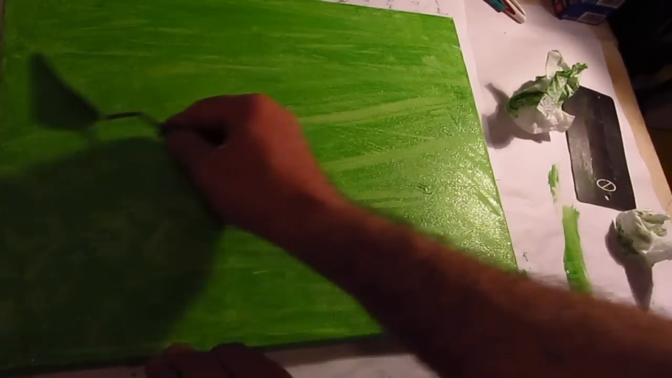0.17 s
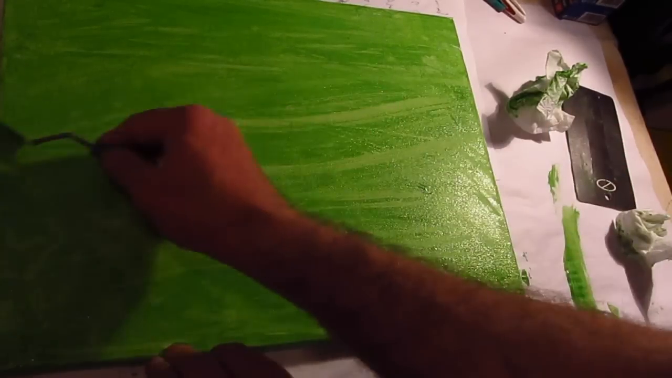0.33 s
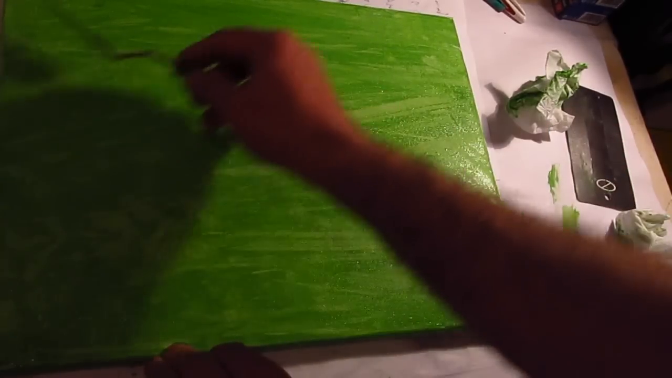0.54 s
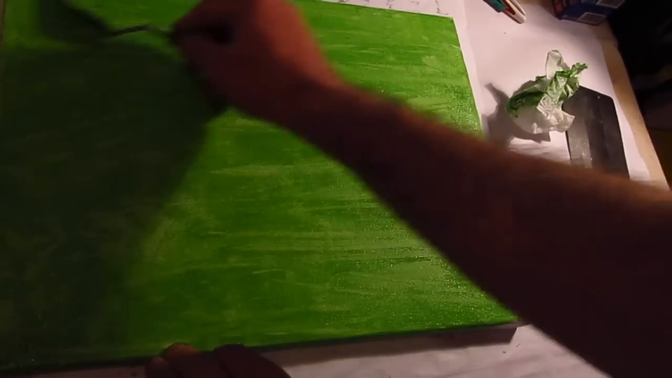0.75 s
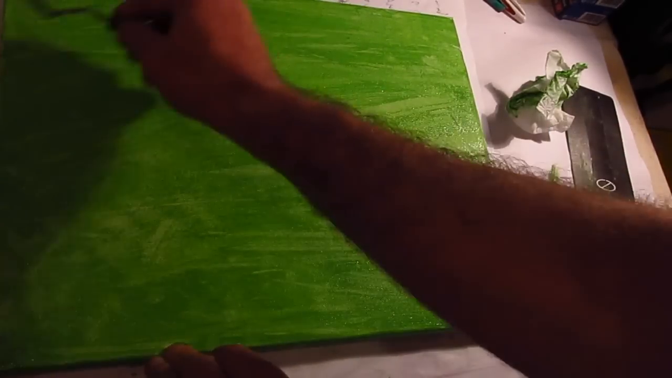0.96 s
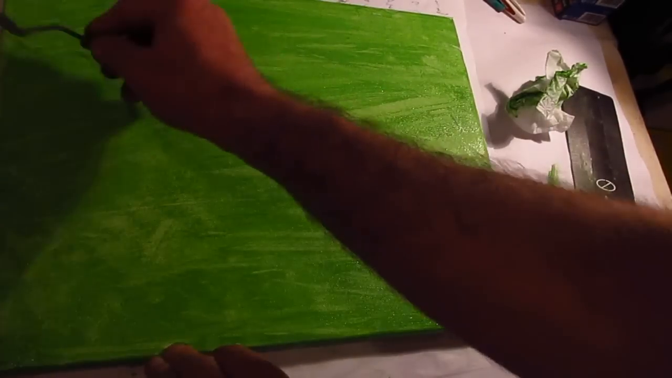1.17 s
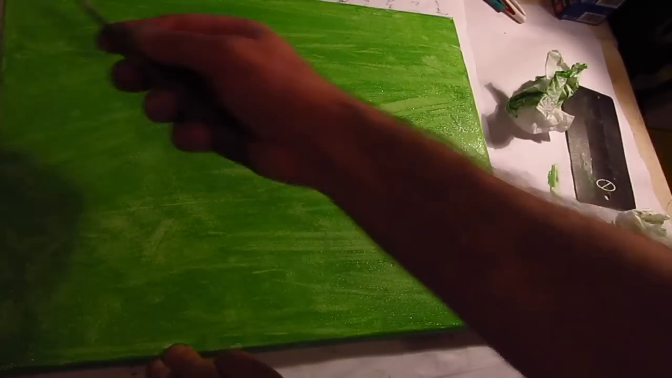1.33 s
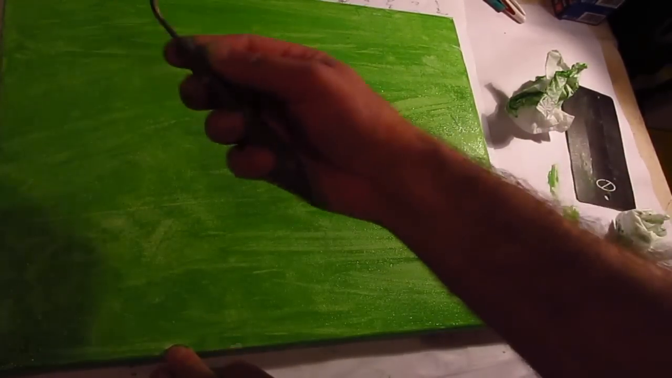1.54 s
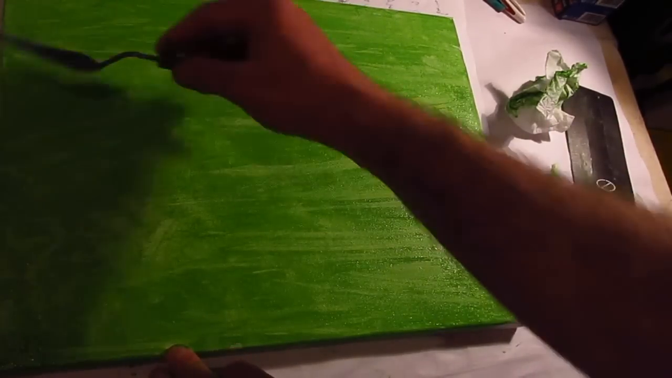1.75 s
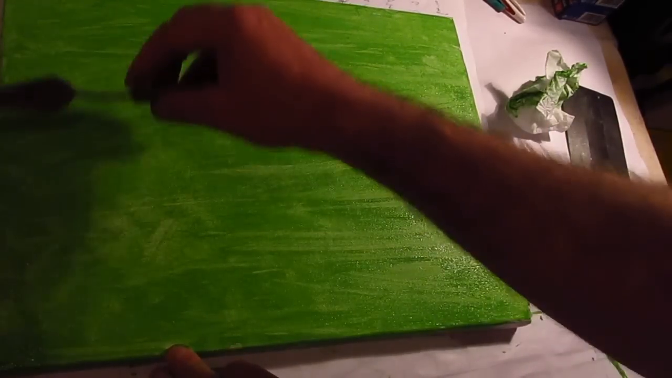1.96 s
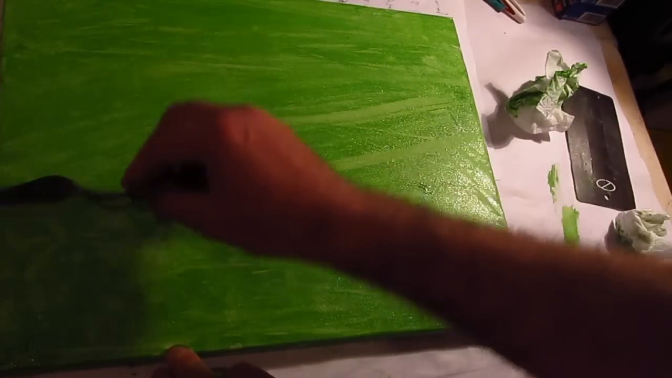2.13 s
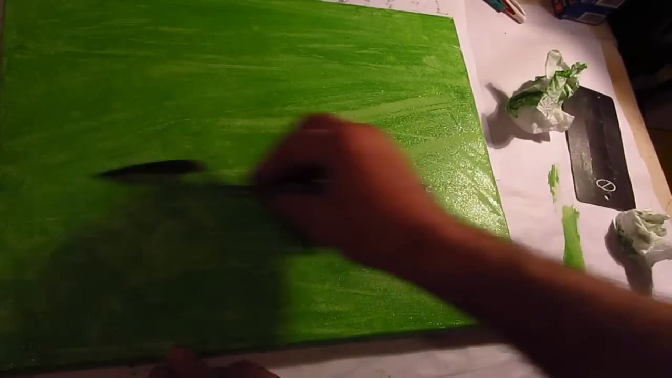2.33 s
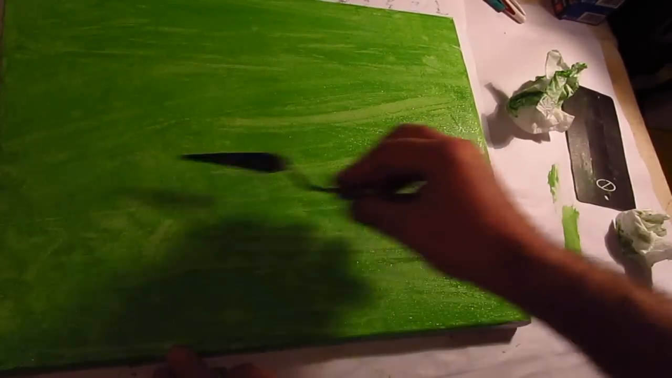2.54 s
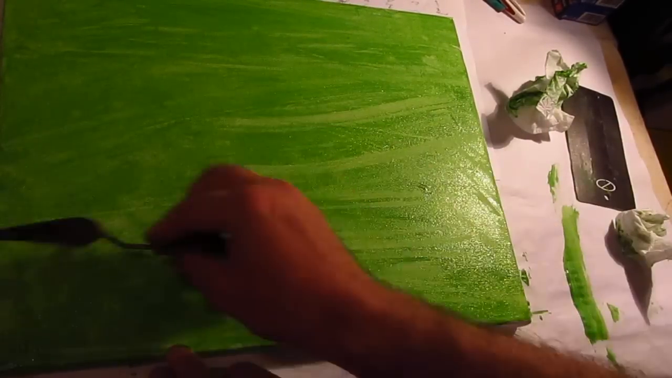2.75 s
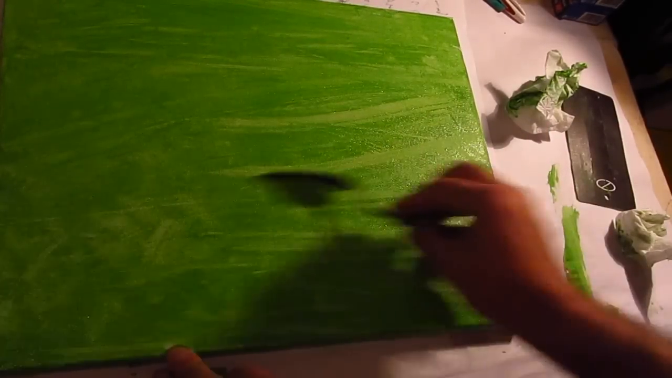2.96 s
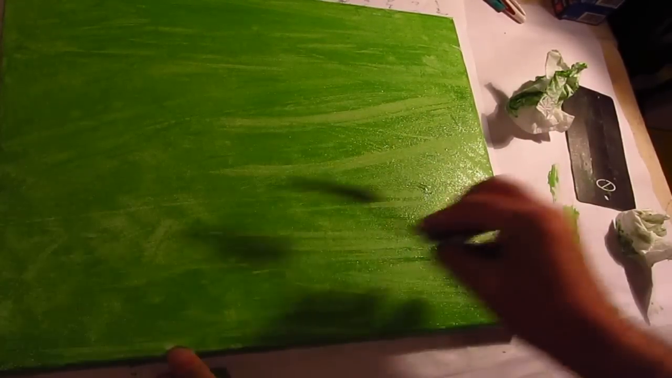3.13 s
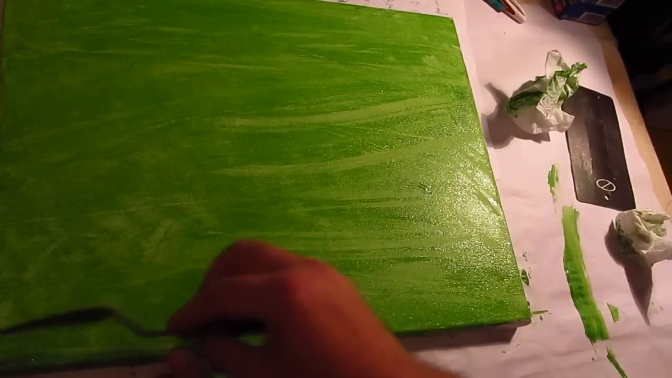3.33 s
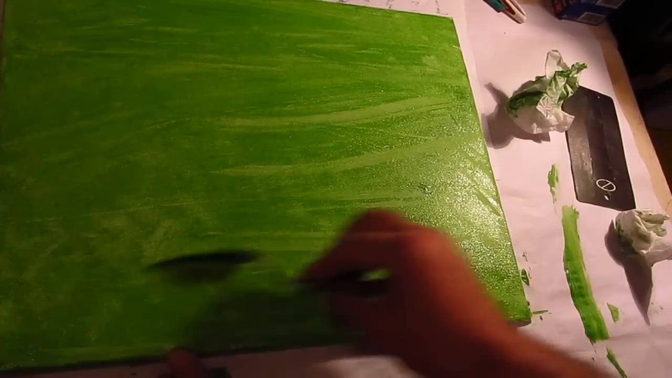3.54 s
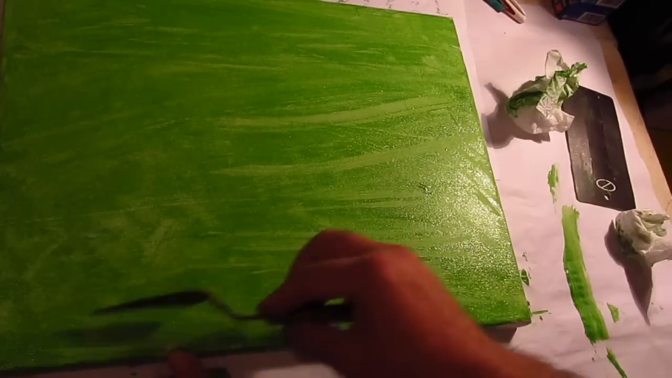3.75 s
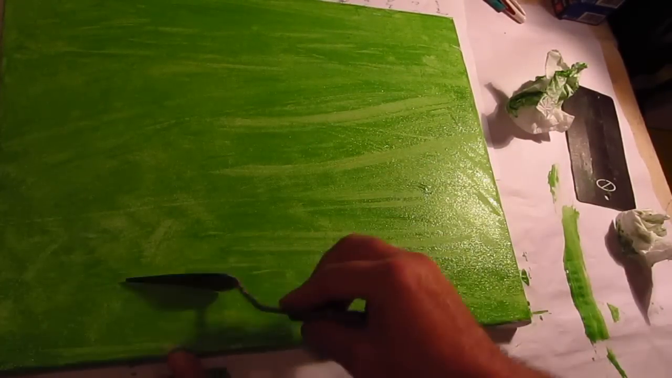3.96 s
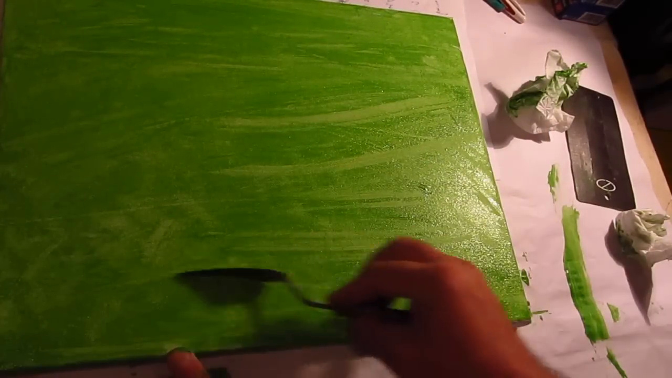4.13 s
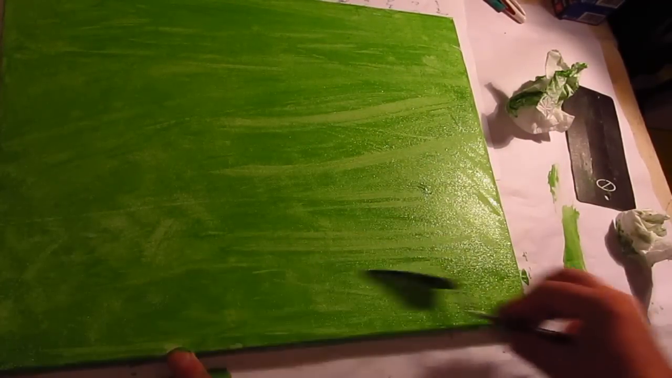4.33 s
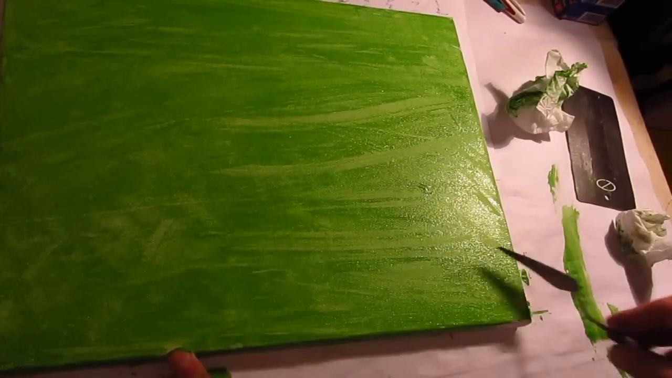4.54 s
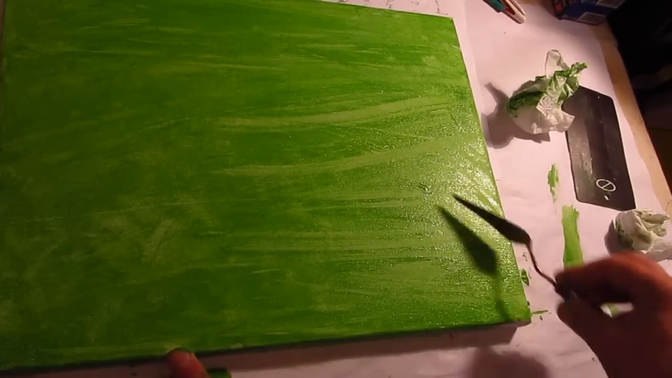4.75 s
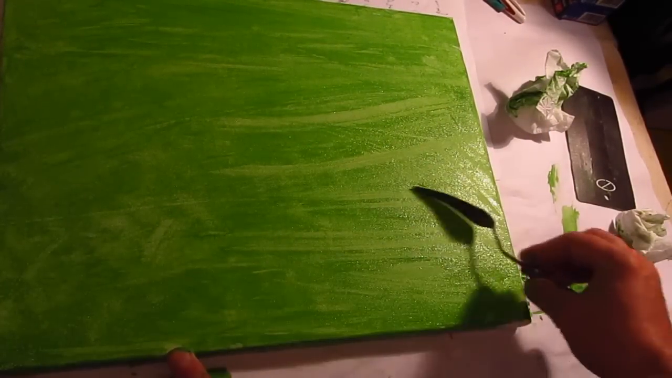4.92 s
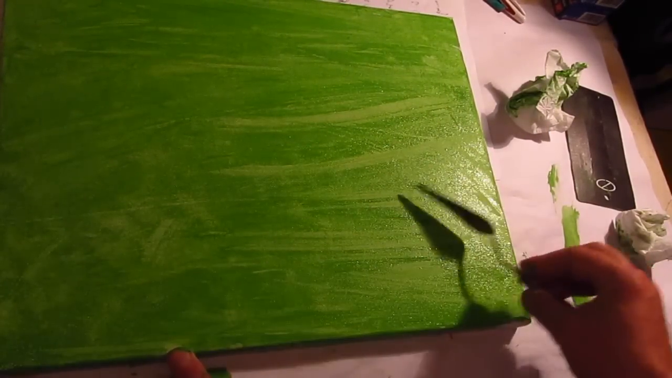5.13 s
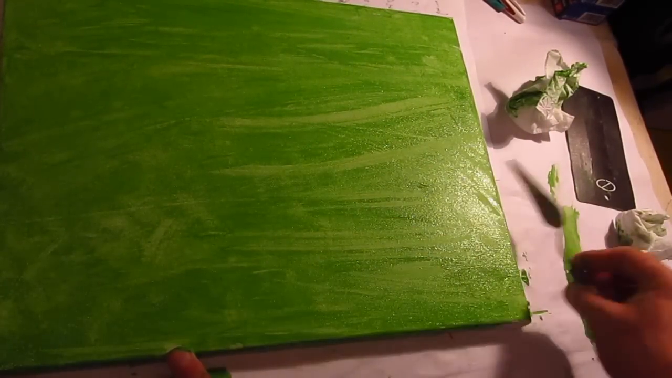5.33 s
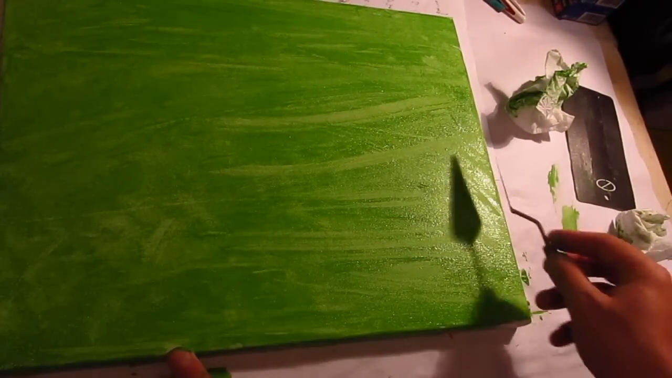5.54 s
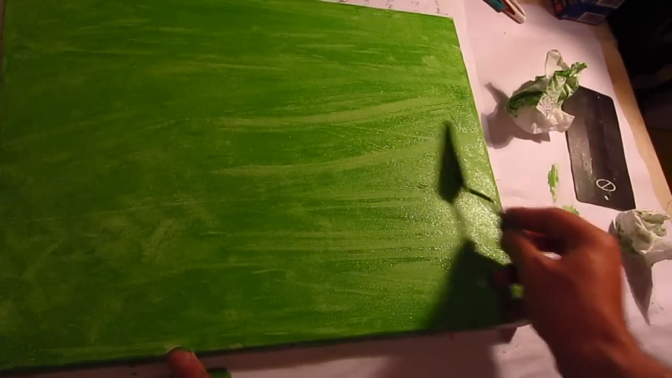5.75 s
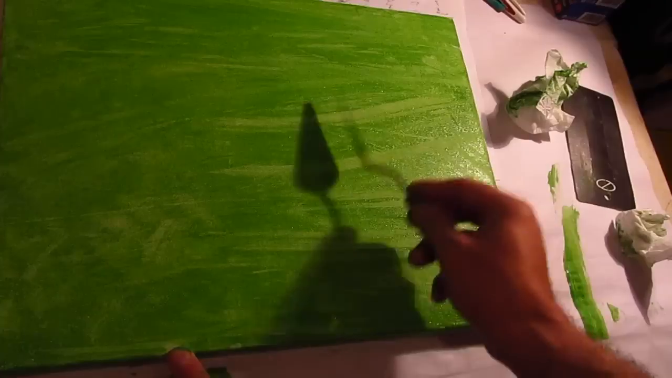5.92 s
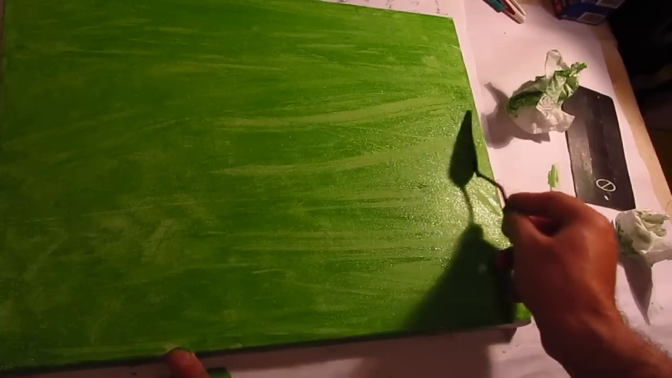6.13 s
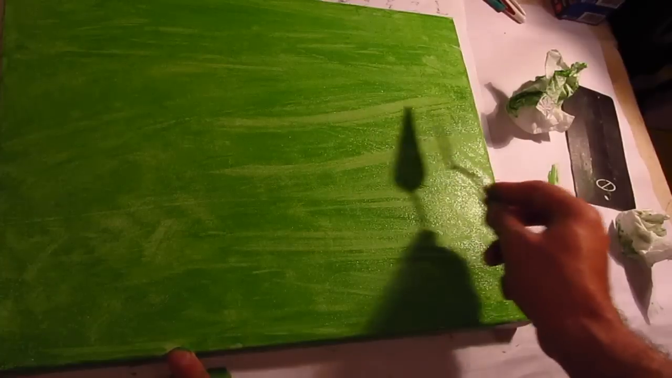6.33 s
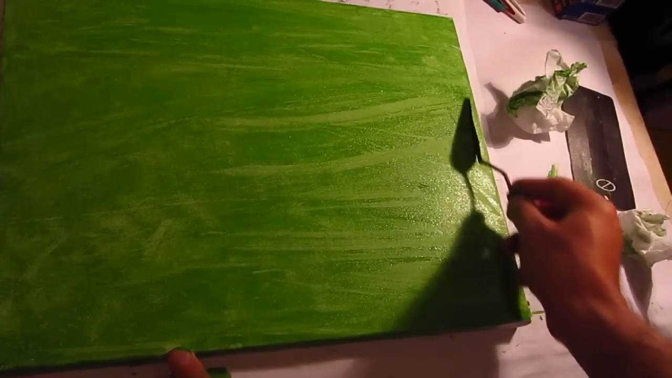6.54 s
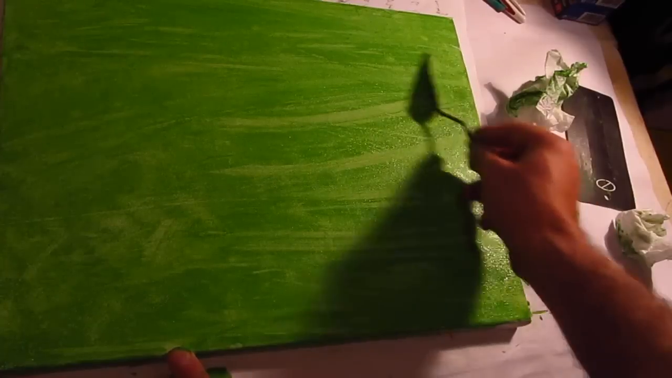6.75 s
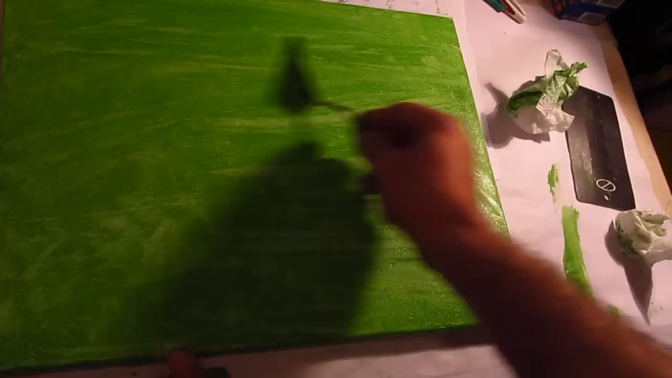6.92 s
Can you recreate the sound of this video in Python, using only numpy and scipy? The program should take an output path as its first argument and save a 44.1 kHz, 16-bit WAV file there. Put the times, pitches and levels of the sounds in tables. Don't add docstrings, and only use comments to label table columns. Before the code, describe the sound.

Close up in a small quiet room, a flexible metal painting knife works on a stretched canvas. Two scrapes come at once, then short gritty strokes separated by pauses, with a harder landing just after two seconds. The cloth answers with a hollow drum tone, the edge hisses over the weave, and the thin blade rings softly as it lifts. Later strokes come more steadily, ending in a sharp tap and scrape.

```python
import sys
import numpy as np
from scipy import signal
from scipy.fft import rfft, irfft, next_fast_len
from scipy.io import wavfile
from scipy.ndimage import uniform_filter1d, minimum_filter1d, map_coordinates

SR = 44100
rng = np.random.default_rng(int(sys.argv[2]) if len(sys.argv) > 2 else 0)


def volts_from_decibels(level):
    exponent = np.asarray(level, float) / 20
    return 10 ** exponent


def output_pcm(signal):
    pcm = np.clip(np.atleast_2d(signal).T, -1, 1) * 32767
    wavfile.write(sys.argv[1], SR, np.round(pcm).astype(np.int16))


N = 307818
TIME = np.arange(N) / SR
FFT_SIZE = next_fast_len(N)
HZ = np.fft.rfftfreq(FFT_SIZE, 1 / SR) + 1
GESTURE_S = np.arange(-100, 7100) / 1000


def level(x, db):
    return x * volts_from_decibels(db) / np.sqrt(np.mean(x ** 2))


def shape(x, gain):
    return irfft(rfft(x, FFT_SIZE) * gain, FFT_SIZE)[..., :N]


def colour(points):
    hz, db = np.transpose(points)
    return volts_from_decibels(np.interp(np.log(HZ), np.log(hz), db))


def band(lo_hz, hi_hz, order=6):
    return 1 / np.sqrt((1 + (lo_hz / HZ) ** (2 * order)) * (1 + (HZ / hi_hz) ** (2 * order)))


def ring(x, hz, t60):
    pole = np.exp(2j * np.pi * hz / SR - np.log(1000) / (max(t60, .002) * SR))
    return signal.lfilter([1], [1, -pole], x).imag


def walk(rate):
    k = int(SR / rate)
    return uniform_filter1d(np.repeat(rng.standard_normal(N // k + 1), k), k)[:N]


def patches(size, step_bins, step_frames):
    field = rng.standard_normal((size[0] // step_bins + 1, size[1] // step_frames + 1))
    return np.kron(field, np.ones((step_bins, step_frames)))[:size[0], :size[1]]


def spread(alike_hz, side_db):
    mid, side = rng.standard_normal((2, N))
    side = shape(side, np.hypot(HZ, volts_from_decibels(side_db) * alike_hz) / np.hypot(HZ, alike_hz))
    return np.array([mid + side, mid - side])


def blend(db, *columns):
    loudest = db.max(axis=0)
    weight = volts_from_decibels(db - loudest) ** 2
    mixed = [np.sum(weight * c, axis=0) / np.sum(weight, axis=0) for c in columns]
    return [np.interp(TIME, GESTURE_S, uniform_filter1d(c, size=7)) for c in [loudest] + mixed]


# pitch_hz, level_db (per Hz)
AIR_COLOUR = [(25, -22.5), (110, -6.5), (160, -9), (260, -2.5), (500, -5), (1000, -10), (1500, -11),
              (2000, -17), (4000, -20.5), (6000, -27), (7500, -28), (9000, -26), (12000, -68.5),
              (14000, -78)]
# pitch_hz, level_db
HUM_TONES = [
    (120, -74.5),
    (210.5, -61.5),
]


def air():
    hum = 0
    for hz, db in HUM_TONES:
        hum = hum + volts_from_decibels(db + 2.0 * walk(3.6)) * np.sqrt(2) * np.sin(2 * np.pi * hz * TIME)
    murmur = level(shape(spread(2200.0, -8.5), colour(AIR_COLOUR)), -53.5)
    return murmur * volts_from_decibels(walk(4.5) + 0.85 * walk(2.1)) + hum


# start_s, pitch_hz, level_db
FRAME_BUMPS = [
    (0.03, 45, -51),
    (2.215, 112.3, -54),
    (2.325, 117, -48.5),
    (2.835, 120, -52),
]


def bumps():
    return sum(volts_from_decibels(db) * np.exp(-((TIME - s - .015) / 0.017) ** 2) * np.sin(2 * np.pi * hz * TIME)
               for s, hz, db in FRAME_BUMPS)


# middle_s, half_length_s, level_db, squeak_hz
FINGER_SHIFTS = [(0.503, 0.0475, -57.5, 3670), (1.596, 0.0814, -59, 2790), (1.689, 0.086, -62, 2734),
                 (1.765, 0.098, -54, 2292), (1.885, 0.0384, -59.5, 2406), (1.967, 0.059, -61.5, 2900),
                 (2.631, 0.099, -56.5, 3010), (2.676, 0.043, -57, 2920), (3.247, 0.043, -52, 3600),
                 (3.407, 0.087, -58.5, 2825), (5.444, 0.086, -61, 3150), (5.683, 0.023, -57, 2850)]


def fingers():
    s, half, db, hz = np.transpose(FINGER_SHIFTS)[:, :, None]
    return blend(db - 20 * ((GESTURE_S - s) / half) ** 2, hz + 0 * GESTURE_S)


def handling():
    db, hz = fingers()
    skin = band(2200, 11000, order=5) * band(1, 7000, order=1)
    hiss = level(shape(spread(1500., 0.94), skin) * volts_from_decibels(2.0 * walk(150)), -2.3)
    squeak = level(np.cos(2 * np.pi * np.cumsum(hz) / SR) * walk(280), -8.5)
    return (hiss + squeak) * volts_from_decibels(db)


# (peak_s, level_db)
BLADE_LIFTS = [
    (2363, .17, [(3.04, -40), (4.77, -36), (5.33, -24)]),
    (2654, .14, [(.355, -46), (.885, -35), (1.145, -31), (2.482, -46), (3.04, -46), (3.61, -37), (4.77, -43), (6.315, -41)]),
    (3740, .11, [(3.035, -36)]),
    (3775, .26, [(4.77, -45), (5.34, -51)]),
    (5071, .13, [(.885, -42), (1.145, -43), (2.482, -42), (3.04, -41), (3.61, -43), (4.77, -44), (5.07, -47)]),
    (6484, .16, [(.885, -38), (1.145, -48), (2.482, -51), (3.04, -39), (3.61, -44), (4.77, -42), (5.34, -45)]),
    (7553, .22, [(1.145, -45), (3.04, -45), (3.61, -46), (4.515, -50), (4.78, -47), (5.09, -46), (5.9, -52)]),
    (8180, .16, [(2.482, -37), (3.04, -51), (4.77, -48), (5.34, -43)]),
    (8899, .14, [(1.145, -40), (5.34, -45), (5.895, -34)]),
    (12436, .25, [(2.32, -58), (3.54, -50), (3.9, -52), (4.98, -58), (5.27, -54), (6.76, -57), (6.9, -56)]),
]


def lifts():
    out = 0
    for hz, t60, rows in BLADE_LIFTS:
        swell = sum(volts_from_decibels(db - 60 * np.maximum(TIME - s, (s - TIME) * 3) / t60) for s, db in rows)
        rough = volts_from_decibels(-.5 + 3.5 * walk(150))
        out = out + swell * rough * np.sin(2 * np.pi * hz * TIME + 1.1 * walk(70))
    return out


# start_s, peak_db, drum_hz, thud_db and snap_db (both over the peak)
LANDINGS = [(0.7, -34, 880, -13.5, 1), (1.063, -26, 1000, -13.5, 2), (1.977, -46, 1210, -11, -14),
            (2.078, -39, 900, -24.5, -22.5), (2.169, -13, 940, -18, -12), (2.794, -18.5, 1187, -20, -10.5),
            (3.442, -30.5, 863, -18.5, 6), (3.68, -43, 850, -28, 1), (3.733, -48, 1140, -27.5, 10.5),
            (3.827, -15, 954, -25, -8.5), (4.037, -36.5, 1240, -13.5, -2), (4.062, -40, 875, -26.5, 3),
            (4.672, -20, 977, -8.5, -2.5), (4.905, -20, 972.7, -29, -11.5), (4.945, -28, 1100, -20, -30),
            (5.205, -19.5, 1053, -20.5, -6.5), (5.701, -28, 976, -22, -3.5), (6.138, -36, 1020, -22.5, 11),
            (6.498, -39, 1066, -19.5, 6.5), (6.798, -11.5, 930, -28, -35)]
# pitch_hz, level_db, t60_s
KNOCK_TONES = [
    (1720, 1, 0.011),
    (2400, 1, 0.006),
    (3387, -1, 0.006),
    (4300, -3, 0.005),
]


def taps():
    size = 4096
    out = np.zeros((2, N + size))
    chance = rng.standard_normal((len(LANDINGS), 2, size))
    t = np.arange(size) / SR
    rattle_filter = signal.butter(2, [600, 4200], 'band', fs=SR)
    for (s, db, drum_hz, thud_db, snap_db), noise in zip(LANDINGS, chance):
        blow = noise * np.exp(-t / .004) * .07
        heel = int(40 + 12 * abs(noise[0, -20]))
        blow[:, 0], blow[:, heel] = 1.0, -.3
        push = blow * (np.arange(size) != heel)
        drum = ring(push, drum_hz, 0.0237) + 0.16 * ring(push, 1.2 * drum_hz, 0.043)
        drum = drum + 0.094 * ring(push, drum_hz, 0.05)
        rattle = signal.lfilter(*rattle_filter, noise[0] + 0.7 * noise)
        drum = drum + volts_from_decibels(-9) * rattle * np.exp(-t / 0.012)
        thud = 1.9 * (ring(blow, 312, .085) - ring(blow, 312, .025))
        thud = thud + 0.1 * ring(blow, 200, 0.053) + .3 * ring(blow, 90, .07)
        knock = sum(volts_from_decibels(g + 1.5 * a) * ring(blow, f * (1 + .07 * b), t60)
                    for (f, g, t60), a, b in zip(KNOCK_TONES, noise[0, -8:], noise[1, -8:]))
        snap = (.5 * np.diff(noise[0], prepend=0) + 1.4 * noise) * np.exp(-t / 0.0049)
        k = int((s + 0.00079) * SR)
        hit = .6 * drum + volts_from_decibels(thud_db) * thud + volts_from_decibels(snap_db) * (.95 * knock + .55 * snap)
        out[:, k:k + size] += volts_from_decibels(db) * hit
    soft_top = colour([(1, 0), (9000, 0), (11000, -16), (14500, -26), (22050, -60)])
    return shape(out[:, :N], band(110, 20000, order=2) * soft_top)


# start_s, swell_s, hold_s, full_db (after the swell), lift_db (at the lift)
PUSHES = [(-.06, 0.046, 0.2968, -25, -25.5), (0.206, 0.055, 0.0957, -26.5, -39),
          (0.706, 0.085, 0.0813, -21, -23.5), (1.075, 0.025, 0.0398, -24, -25.5),
          (2.205, 0.045, 0.21, -31, -33), (2.797, .11, 0.0601, -24, -21.5),
          (2.96, 0.028, 0.0331, -26, -28.5), (3.446, 0.12, 0.0361, -24, -23),
          (3.841, 0.054, 0.03656, -21, -24), (4.035, 0.072, 0.033, -36, -34),
          (4.12, 0.027, 0.048, -35.5, -37.5), (4.195, 0.015, 0.052, -33.5, -33.5),
          (4.239, 0.047, .07, -28, -29), (4.328, 0.099, 0.06765, -19.5, -23),
          (4.676, 0.049, 0.03, -24.5, -25.5), (4.931, 0.069, 0.062, -29.5, -32.5),
          (5.215, 0.037, 0.0659, -21, -19), (5.704, 0.056, 0.073, -26, -23),
          (5.769, 0.051, 0.056, -17.5, -20), (6.159, 0.048, 0.084, -22.5, -24),
          (6.5, 0.22, 0.042, -30.5, -36.5), (6.67, 0.1, 0.041, -22, -19.5),
          (6.817, 0.078, 0.183, -18.5, -29)]
# swell_db, drum_db (over the scrape), flex_db, hiss_db (both over it), chatter_hz
PUSH_GRIPS = [(3, 3, -11, 2, 360), (3, -1, -4, -2.5, 300), (14.64, -4, -10, 1, 525),
              (16.5, -8.5, -10.5, 0, 365), (18.15, -4, -10.5, 0, 360), (19.1, -2.5, -7.5, -2.5, 680),
              (1.99, -1, -4, -1, 530), (9.16, -6.5, -7.5, -3.5, 420), (24.23, -6, -8.5, -4.5, 325),
              (9.61, -5, -2.5, -7, 435), (3, -4.5, -12, -4.5, 370), (5, -12, 0.5, -3.5, 300),
              (11.1, -13.5, 0.5, -4.5, 390), (9.5, -8.5, -7, -7, 390), (2.02, -4, -5.5, -2.5, 240),
              (31.3, -2, -7, 0, 1000), (24.01, -1.5, -4.5, -3.5, 430), (15.5, 3.5, -1.5, -7.5, 540),
              (5.92, -6, -8, -1.5, 490), (28.8, 4, -4.5, 1.5, 590), (16.6, -3, -14, -3, 200),
              (10.7, 2.5, -4, -1.5, 330), (2, -5.5, -7.5, 2.5, 120)]
PUSH_WEAVE_DB = [3.5, 3.5, 3, 1.5, -1.5, 0.5, 0.5, 0.5, -0.5, -7, -11, -2, -6, 3.2, -4.5, 4, 0, 4, -20, -3,
                 -18, 6.5, -9]
PUSH_BITE_DB = [2, -1, 4.5, 0.5, 0, 1, 0, -5, -1.5, -3.5, 2, -4.5, -2, -0.5, 0.5, 6.5, 3, -1, 2, 1, -9,
                -2.5, -4]
# pitch_hz, level_db
PUSH_SINGING = [(1050, 0.5), (950, 1), (2300, 2.5), (2400, 1.5), (2050, 6.5), (2950, 1), (1000, 0.5),
                (2600, 4.5), (1500, 2.5), (1680, 1.5), (1680, -1.5), (1700, 2), (1700, 1), (1720, -1.5),
                (1800, 4), (1100, 9.5), (1050, 1.5), (850, 1), (950, 0.5), (1100, 3), (1000, 0), (900, 2),
                (1200, 5.5)]


def hand():
    start, swell, hold, full_db, lift_db = np.transpose(PUSHES)[:, :, None]
    swell_db, drum_db, flex_db, hiss_db, chatter_hz = np.transpose(PUSH_GRIPS)[:, :, None]
    age = GESTURE_S - start
    free = np.maximum(age - swell - hold, 0)
    db = full_db - swell_db * np.clip(1 - age / swell, 0, 1) ** 1.3
    db = db + (lift_db - full_db) * np.clip((age - swell) / hold, 0, 1)
    db = db - 525.5 * free - 6 * (1 - np.exp(-free / 0.004))
    db = db - 4000 * np.maximum(-age, 0)
    tip = np.clip(age / (swell + hold), 0, 1) - .5
    light = np.clip((np.maximum(full_db, lift_db) - db) / 20, 0, 1)
    return blend(db, drum_db + 0.5 * tip, flex_db + 1.5 * tip, hiss_db + 4 * tip,
                 chatter_hz * (1 - 0.37 * light),
                 np.array(PUSH_WEAVE_DB)[:, None], np.array(PUSH_BITE_DB)[:, None],
                 *np.transpose(PUSH_SINGING)[:, :, None])


def thread_rub(patch, sing_hz, sing_db):
    grains = rng.standard_normal(N) * volts_from_decibels(np.minimum(3.0 * rng.exponential(size=N), 12))
    rub = level(grains, -0.89) + level(patch, -1.2) * volts_from_decibels(2.0 * walk(900))
    z = signal.stft(rub, nperseg=512)[2]
    field = uniform_filter1d(patches(z.shape[1:], 3, 10), size=3, axis=0)
    field = uniform_filter1d(field, size=10, axis=1)
    frame = np.minimum(np.arange(z.shape[2]) * 256, N - 1)
    bin_hz = np.arange(z.shape[1])[:, None] * SR / 512
    off = (bin_hz - sing_hz[frame]) * 2 / 260
    z = z * volts_from_decibels(3.1 * field + sing_db[frame] / (1 + off ** 2))
    return signal.istft(z, nperseg=512)[1][:, :N]


# middle_s, change_db
EDGE_FLICKS = [(0.756, 0.5), (.82, 4.5), (0.876, 6.5), (1.098, 5), (1.124, 1.5), (2.469, 13), (2.93, 2.5),
               (2.958, 3.5), (3.6, 2), (5.825, -4), (4.13, 5), (4.269, 0), (4.502, 7.5), (4.722, 3),
               (4.755, 3), (5.058, 5.5), (5.327, 5.5)]


def flicks():
    return sum(g * np.exp(-((TIME - s) / 0.004) ** 2) for s, g in EDGE_FLICKS)


# start_s, change_db, ease_s
WEAVE_CATCHES = [(0.711, -6, 0.0208), (.736, 1, .02), (1.094, -1, 0.0195), (2.223, 4.5, .02),
                 (2.457, 4.5, .015), (2.888, 5, .02), (2.955, -2.5, .008), (3.015, 3.5, 0.018),
                 (3.884, 0.5, .02), (4.061, 1.5, 0.01525), (4.102, 6, .03), (4.211, 1.5, .02),
                 (4.263, 7, 0.0182), (4.386, 0, 0.0172), (4.695, -3.5, 0.0179), (4.72, 3, 0.022),
                 (4.98, -0.5, 0.0214), (5.003, -1.5, 0.015), (5.238, -1.5, 0.01333), (5.253, -1, 0.0358),
                 (5.72, 2, 0.0285), (5.764, 2, 0.01986), (6.187, 7.5, 0.0077), (6.59, -0.5, 0.014),
                 (6.647, 1, 0.022)]


def catches():
    return sum(g * (TIME > s) * np.exp(-np.abs(TIME - s) / ease) for s, g, ease in WEAVE_CATCHES)


# pitch_hz, level_db (per Hz)
SCRAPE_COLOUR = [(350, -42.5), (600, -1.5), (743, -14), (854, -4.5), (981, -5.5), (1470, -4.5), (2520, -8),
                 (2970, -5), (5500, -10), (5940, -6.5), (7080, -9.5), (10300, -14), (12200, -27),
                 (15800, -72.5), (22000, -120)]
# pitch_hz, width_hz, boost_db
CANVAS_TONES = [
    (847, 320, 8),
    (945, 25, 4.5),
    (1125, 240, 4),
    (1594, 28, 2.5),
    (2250, 78, 0),
    (2900, 150, 0.5),
    (4660, 380, 0.5),
    (6330, 880, -3.5),
]


def cloth(rub, drum_db, flex_db, bite_db, hiss_db, bent, flick):
    body = colour(SCRAPE_COLOUR)
    body = body * volts_from_decibels(sum(g / (1 + (2 * (HZ - f) / w) ** 2) for f, w, g in CANVAS_TONES))
    parts = [(band(700, 1300), volts_from_decibels(drum_db) * volts_from_decibels(-.6 * flick)),
             (band(1300, 2000), volts_from_decibels(flex_db) * np.sqrt(1 - bent)),
             (band(2000, 2700), .52 * volts_from_decibels(bite_db)),
             (band(2700, 5000), .85),
             (band(5000, 13000), volts_from_decibels(hiss_db + 3))]
    return sum(level(shape(rub, body * part), 0) * gain * volts_from_decibels(1.3 * walk(60)) for part, gain in parts)


# pitch_hz, width_hz, level_db
FLEX_TONES = [
    (1697, 190, 9),
    (2445, 82, 1),
    (2920, 120, -2.5),
    (4060, 310, -10.5),
]


def bent_blade(rub, flex_db, bent):
    steel = np.sqrt(sum(volts_from_decibels(g) ** 2 / (1 + (2 * (HZ - f) / w) ** 2) ** 2 for f, w, g in FLEX_TONES))
    return level(shape(rub, steel), 0.58) * volts_from_decibels(flex_db + 2.0 * walk(50)) * np.sqrt(bent)


def weave_chatter(patch, db, chatter_hz, weave_db):
    chatter_db = np.minimum(-14.5 - 0.56 * (db + 28.5) + weave_db, 8)
    turn = 2 * np.pi * np.cumsum(chatter_hz * (1 + 0.07 * walk(45))) / SR
    tone = np.cos(turn) * volts_from_decibels(6.0 * walk(45))
    rumble = 0.81 * level(shape(patch, band(250, 640)), 0)
    return volts_from_decibels(chatter_db) * level(tone + rumble, 0)


def scrape():
    db, drum_db, flex_db, hiss_db, chatter_hz, weave_db, bite_db, sing_hz, sing_db = hand()
    patch = spread(2000.0, -7)
    rub = thread_rub(patch, sing_hz, sing_db)
    bent = np.clip((flex_db - drum_db + 2.5) / 3.5, 0, .9)
    flick = flicks()
    stutter = walk(90) + 1.3 * walk(450) + flick + catches()
    out = cloth(rub, drum_db, flex_db, bite_db, hiss_db, bent, flick) + bent_blade(rub, flex_db, bent)
    out = out + weave_chatter(patch, db, chatter_hz, weave_db)
    return out * volts_from_decibels(db - 4.0 + stutter)


# pitch_hz, level_db, t60_s
BLADE_TONES = [
    (2365, -23.5, 0.16),
    (3750, -28.5, 0.15),
    (5340, -26.5, 0.23),
    (6480, -24.5, .18),
    (7400, -22.5, 0.1),
]


def blade_ring(knife):
    strike = knife.mean(axis=0)
    return sum(volts_from_decibels(db) * ring(strike, hz, t60) / np.sqrt(t60 * SR) for hz, db, t60 in BLADE_TONES)


# time_s, left_minus_right_db, left_lag_samples
BLADE_PLACE = [
    (0, 9, -2),
    (1.3, 10.5, -2.5),
    (3.9, 6.5, 1.45),
    (4.1, 7, 0.8),
    (5.499, 5, -1.5),
    (6.98, 7, 0.25),
]


def two_ports(knife):
    s, *place = np.transpose(BLADE_PLACE)
    pan_db, lag = (np.interp(TIME, s, c) for c in place)
    low = shape(knife, band(0.94, 3000, order=1))
    knife = low + (knife - low) * volts_from_decibels(np.array([pan_db, -pan_db]) / 2)
    knife[1] = map_coordinates(knife[1], [np.arange(N) + lag], order=3, mode="nearest")
    knife[1] = shape(knife[1], 1 + volts_from_decibels(-20.5) * np.exp(-2j * np.pi * HZ * 0.0002731))
    return knife


def room(knife):
    t = np.arange(SR // 2) / SR
    walls = rng.standard_normal((2, len(t)))
    walls = walls + .3 * walls[::-1]
    dull = signal.lfilter(*signal.butter(2, 2600, fs=SR), walls)
    bass_t60_s, treble_t60_s = 0.17, 0.14
    walls = dull * volts_from_decibels(-60 * t / bass_t60_s) + (walls - dull) * volts_from_decibels(-60 * t / treble_t60_s)
    walls = walls * (t > .004)
    walls = walls * volts_from_decibels(-8.5) / np.sqrt(np.sum(walls ** 2) / 2)
    return signal.fftconvolve(knife, walls, axes=1)[:, :N]


def scene():
    knife = scrape() + taps() + lifts() + bumps()
    knife = two_ports(knife + blade_ring(knife))
    return knife + room(knife) + handling() + air()


def band_limit(x):
    return signal.sosfilt(signal.butter(12, 14700, fs=SR, output="sos"), x)


# pitch_hz, width_hz
DEAD_BANDS = [
    (5900, 131.4),
    (7850, 110),
]


def record(dry):
    now = np.sqrt(uniform_filter1d(np.mean(dry ** 2, axis=0), size=64) + 1e-12)
    soon = -minimum_filter1d(-now, size=400, origin=-199)
    hz, _, z = signal.stft(np.tanh(dry), SR, nperseg=2048)
    power = uniform_filter1d(np.abs(z) ** 2, size=5, axis=1)
    column_hz = hz[:, None]
    mask_db = np.interp(column_hz, [0, 300, 800, 5000, 6000, 9000, 12000],
                        [-7.5, -14.5, -9.0, -32.0, -31.0, -12.0, -9.0])
    blocks_db = 5.5 * patches(z.shape[1:], 12, 3) + 3.5 * np.array([patches(z.shape[1:], 5, 5) for _ in z])
    blocks_db = blocks_db * (column_hz > 5500)
    faint_db = np.interp(column_hz, [5000, 5600, 7600, 7900, 12000], [-130, -98, -97, -87, -86])
    faint_db = faint_db + sum(14.0 * np.exp(-((column_hz - f) / (1.4 * w)) ** 2) for f, w in DEAD_BANDS)
    middle = power[:, 40:400].mean(axis=1, keepdims=True)
    mask = np.maximum(middle * volts_from_decibels(mask_db) ** 2, volts_from_decibels(faint_db) ** 2) * volts_from_decibels(blocks_db) ** 2
    x = signal.istft(z * (power > mask), SR, nperseg=2048)[1][:, :N]
    x = x * np.clip(12 * now / soon, 0, 1) ** 2
    before = np.roll(uniform_filter1d(now, size=400), 300)
    attack = uniform_filter1d(np.clip(now / before / 5 - 1, 0, 1), size=100)
    x = x + shape(dry, band(11000, 15000)) * attack
    dead = np.prod([1 - .9 * np.exp(-((HZ - f) / (0.92 * w)) ** 2) for f, w in DEAD_BANDS], axis=0)
    return band_limit(shape(x, dead))


dry = scene()
out = record(dry)
output_pcm(out)
```